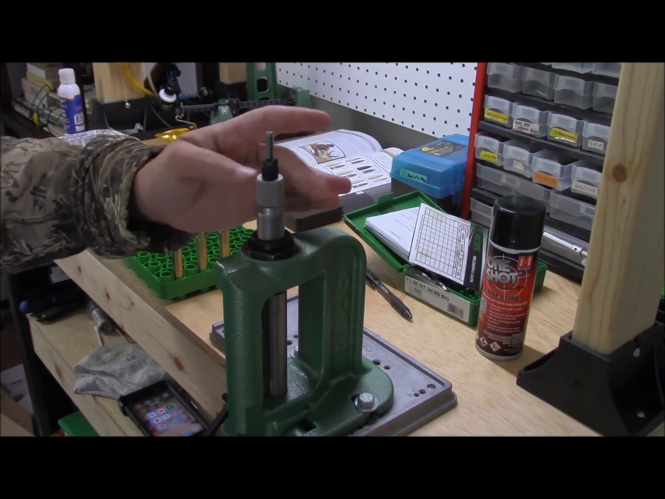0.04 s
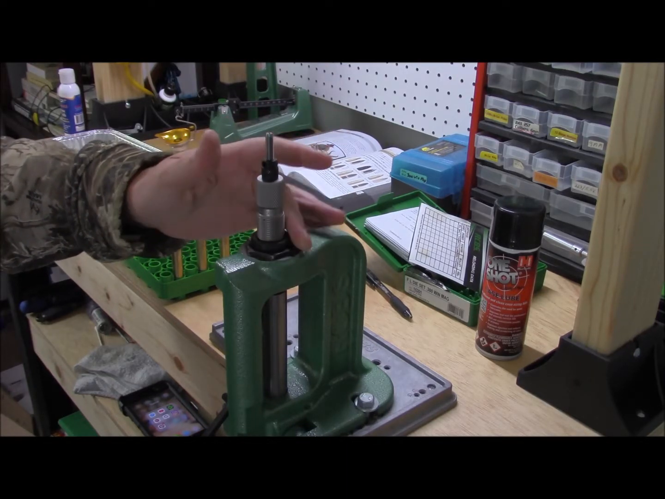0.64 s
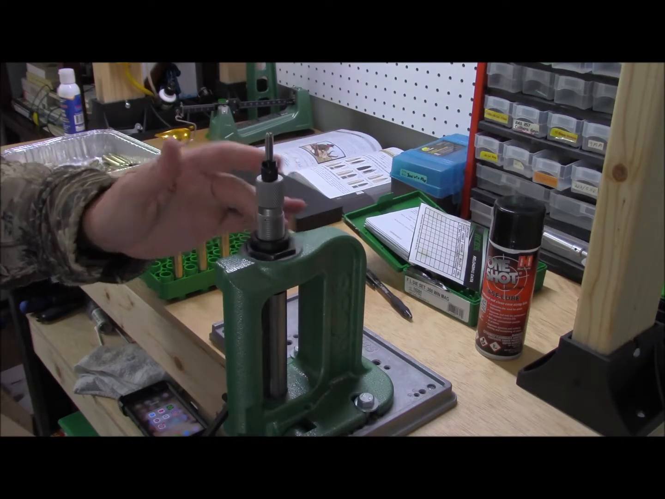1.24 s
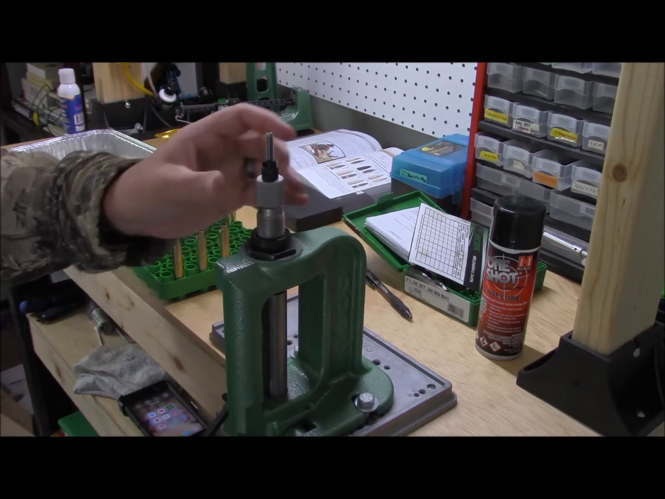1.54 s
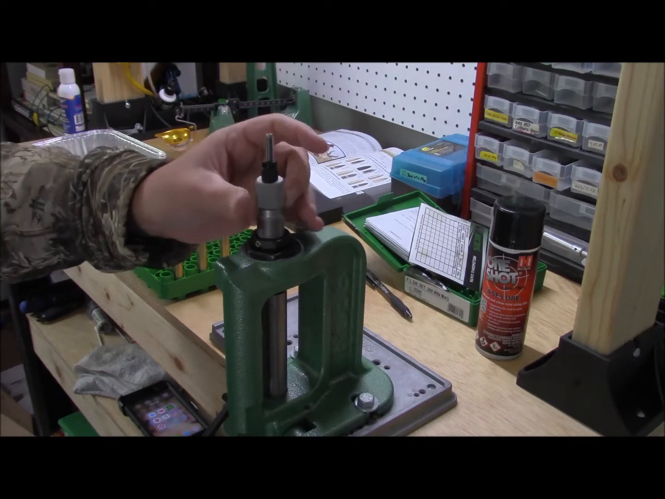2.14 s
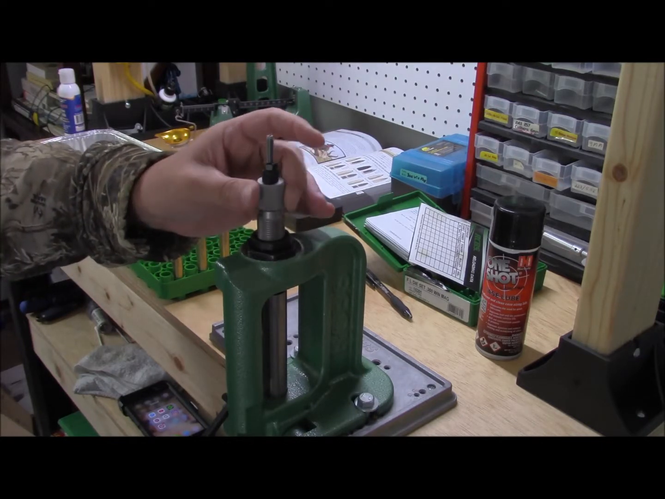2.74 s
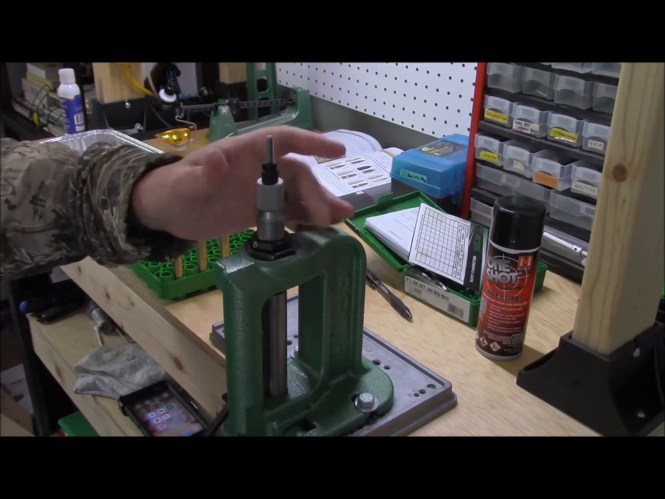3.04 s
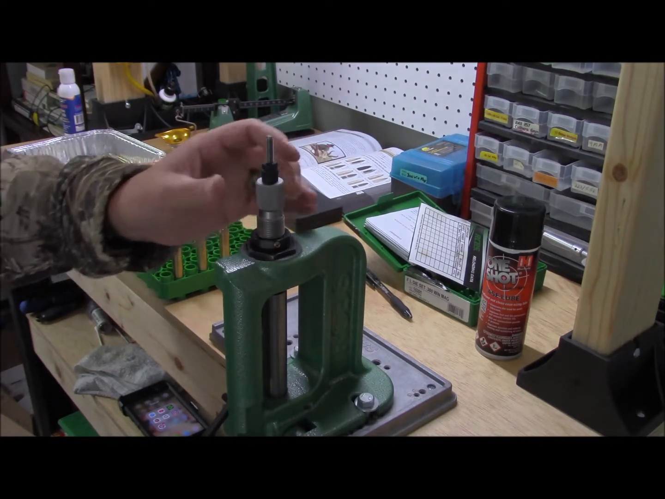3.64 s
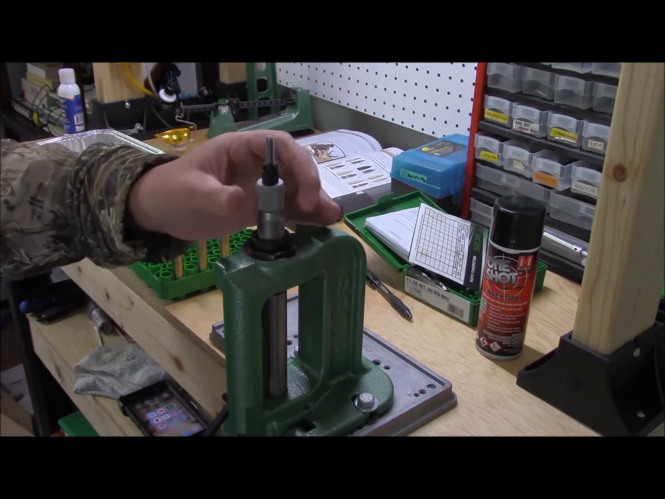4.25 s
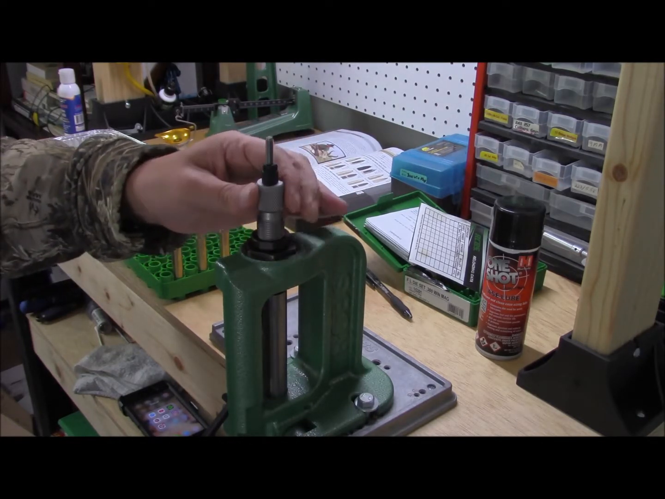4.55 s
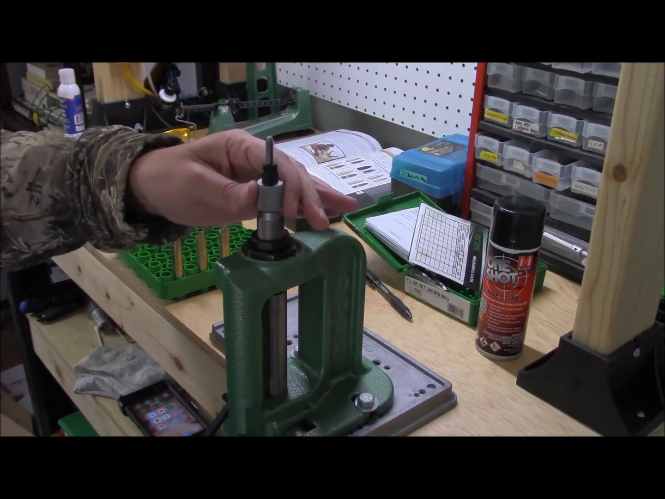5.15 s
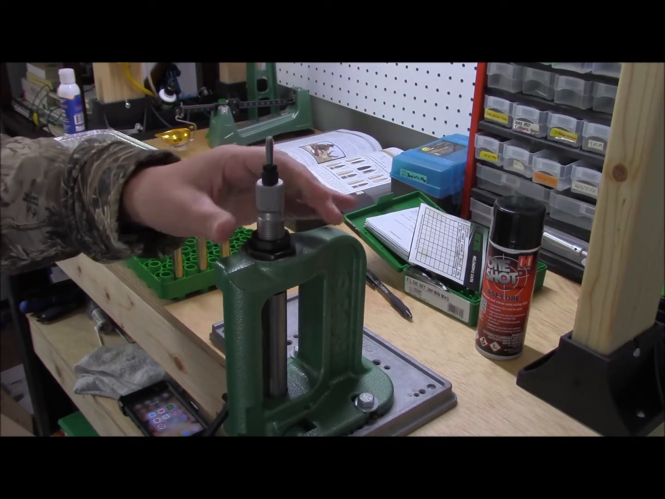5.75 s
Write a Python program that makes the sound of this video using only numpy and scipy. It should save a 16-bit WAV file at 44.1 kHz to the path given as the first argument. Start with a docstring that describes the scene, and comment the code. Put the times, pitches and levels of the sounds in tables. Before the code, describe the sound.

In a small workshop, fingers spin a loose steel die into the threaded top of a cast-iron press. Each of about ten short turns brings light knocks and a wobbling, gritty rasp, and the iron rings briefly. A lock ring clinks now and then, with a tiny squeak and sharp fingernail ticks early on. The last turns are softer. Ventilation, a quiet fluttering fan and a thin electrical whine run underneath. The sound is close and centred.

```python
"""In a small workshop, a steel die is spun by hand into the threaded top of a cast-iron press.
Over ten short turns the loose die knocks in its thread as the fingers grip it, then wobbles and rasps
round; the iron rings with both. The lock ring clinks, a dry spot squeaks, and skin slides and nails tick
on the knurl, the die's ridged grip. Under it all lie humming ventilation, a quiet fluttering fan and
a thin, stuttering electrical whine."""
import sys
import numpy as np
from scipy import signal
from scipy.fft import rfft, irfft
from scipy.io import wavfile
from scipy.ndimage import uniform_filter1d

SR = 44100
rng = np.random.default_rng(int(sys.argv[2]) if len(sys.argv) > 2 else 0)


def materialize(psi):
    """Save the field psi as 16-bit PCM at rate SR to the path in sys.argv[1].

    A 1-D psi becomes a single channel; in a 2-D psi each row is a channel.
    """
    bounded = np.clip(np.atleast_2d(psi).T, -1, 1)
    quanta = np.round(bounded * 32767).astype(np.int16)
    wavfile.write(sys.argv[1], SR, quanta)


N = 259308
TIME = np.arange(N) / SR
HZ = np.maximum(np.fft.rfftfreq(4096, 1 / SR), 1)


def undb(db):
    """Turn decibels into a gain to multiply by."""
    return 10 ** (np.asarray(db) / 20)


def unit(x):
    """Scale a sound to an average power of one."""
    return x / np.sqrt(np.mean(x ** 2))


def curve(points):
    """Join (f/Hz, level/dB) points into one gain for each frequency in HZ."""
    hz, db = np.transpose(points)
    return undb(np.interp(np.log(HZ), np.log(hz), db))


def tint(x, gain):
    """Change a sound's tone with one gain for each frequency in HZ."""
    cepstrum = irfft(np.log(gain + 1e-7))
    half = len(cepstrum) // 2
    # fold onto the first half, so the filter never rings before the sound
    cepstrum[1:half] *= 2
    cepstrum[half + 1:] = 0
    response = irfft(np.exp(rfft(cepstrum)))[:half]
    return signal.fftconvolve(x, response)[:len(x)]


def even(x, bins):
    """Make a random burst equally strong from bass to treble."""
    spectrum = rfft(x, 2 * len(x))
    band_power = uniform_filter1d(np.abs(spectrum) ** 2, size=bins)
    return irfft(spectrum / np.sqrt(band_power))[:len(x)]


def add(track, start_s, sound):
    """Mix a sound into a track at the given time."""
    start = max(int(start_s * SR), 0)
    track[start:start + len(sound)] += sound[:N - start]


def drift(per_s):
    """A value that wanders at random, mostly between -1 and 1."""
    return 1.2 * np.interp(TIME * per_s, np.arange(N // 20), rng.standard_normal(N // 20))


def rubbing(tone, per_s, spread_db):
    """Tiny bumps catch and let go: many small slips, a few large ones."""
    slips = rng.random(N) < per_s / SR
    size_db = spread_db * np.minimum(rng.exponential(size=N), 4)
    clicks = slips * rng.choice([-1, 1], N) * undb(size_db)
    return unit(tint(clicks, curve(tone)))


def bounce(fade_s):
    """One hard hit breaks up into a quick run of tiny rebounds."""
    age = TIME[:len(HZ)] / fade_s
    return even(rng.standard_normal(len(age)) * np.sqrt(age) * np.exp(-age), bins=70)


def push(start_s, driven_s, swell_db, build_s, coast_db_per_s):
    """Loudness of one push: it builds, swells or sags as the fingers drive, then fades as the die coasts."""
    age = np.maximum(TIME - start_s, 0)
    build = 1 - np.exp(-(age / build_s) ** 2)
    to_go = np.maximum(1 - age / driven_s, 0)
    coasting_s = np.maximum(age - driven_s, 0)
    return build * undb(-swell_db * to_go - coast_db_per_s * coasting_s)


# Levels in all tables are relative: they compare one row with another.
# Tone of the low wobble, the middle rasp and the bright grit: f/Hz, level/dB
WOBBLE_TONE = [(100, -34), (180, -10), (245, -3), (420, -0.5), (600, -5), (800, -8.5), (1500, -24.5),
               (4000, -61)]
RASP_TONE = [(300, -18.5), (650, -4.5), (900, 0), (1400, 0), (1900, -3), (2400, -14), (3500, -25.5),
             (7000, -34.5), (14000, -51.5)]
GRIT_TONE = [(900, -28.5), (2300, -2), (2700, 7.5), (3150, 3), (3450, -5.5), (5000, -10), (5600, -12.5),
             (7200, -26.5), (8000, -45), (14000, -47)]
# Finger pushes, one or two to a turn:
# t/s, push length/s, rasp level/dB, grit level/dB, swell/dB, wobble length/s, wobble level/dB
PUSHES = [(-0.05, 0.095, -19.5, -20.5, -7.5, 0.052, -16), (0.339, .2, -26, -33, -0.5, 0.2, -24.5),
          (0.764, 0.094, -22.5, -29, 17.5, 0.16, -33.5), (0.899, 0.049, -27.5, -31.5, -1, 0.04, -26),
          (1.268, .19, -19.5, -22, 10.5, 0.17, -24.5), (1.739, 0.26, -24, -31.5, 15, .33, -25),
          (2.2, 0.21, -24.5, -30, 14, 0.24, -23.5), (2.675, 0.12, -26, -31.5, 3, 0.14, -26.5),
          (2.838, 0.086, -27, -35, -6.5, 0.11, -26.5), (3.209, 0.17, -22.5, -32, 23, .18, -27),
          (3.42, 0.075, -28.5, -34, 0, 0.057, -43), (3.883, 0.14, -31, -37, 5.5, 0.12, -23.5),
          (4.058, 0.046, -26, -33, 3.5, 0.099, -24), (4.36, 0.1, -32, -37.5, 10, 0.15, -33)]
def turning_die():
    """The loose die wobbles, its thread rasps and dry spots add grit; all three judder together."""
    wobble = undb(-5) * rubbing(WOBBLE_TONE, per_s=800, spread_db=1.23)
    rasp = undb(-4) * rubbing(RASP_TONE, per_s=1400, spread_db=2)
    grit = undb(-6) * rubbing(GRIT_TONE, per_s=900, spread_db=2)
    out = np.zeros(N)
    for t, driven_s, rasp_db, grit_db, swell_db, wobble_s, wobble_db in PUSHES:
        out += rasp * undb(rasp_db) * push(t, driven_s, swell_db, build_s=0.02, coast_db_per_s=214)
        out += grit * undb(grit_db) * push(t, driven_s, swell_db, build_s=0.02, coast_db_per_s=205)
        rocking = push(t, wobble_s, 0.39 * swell_db, build_s=0.032, coast_db_per_s=258)
        out += wobble * undb(wobble_db) * rocking
    judder = undb(drift(per_s=90))
    return out * judder


# Notes of the press with the die in it (narrow ones ring longer): f/Hz, width/Hz, level/dB
PRESS_NOTES = [(234.3, 24, 5), (275.6, 9.4, 9), (305.7, 7, 3.5), (394.8, 8.1, 8.5), (583, 21.4, 7.5),
               (729.4, 17.4, 1.5), (919.6, 6.7, 4), (1088, 11, 2.5), (1144.5, 14.6, -2.5), (1274, 23, 4),
               (1446, 18, -7), (1562, 27, -7), (2642, 70, 1), (2832, 61, 1), (3146, 69, -9),
               (3634, 200, -3), (4985, 42, 5.5)]
def press(force):
    """The iron and the die pass on every shake and add their own ringing notes."""
    t = TIME[:SR // 3]
    ring = np.zeros(len(t))
    for hz, width_hz, db in PRESS_NOTES:
        strength = undb(db) * 2 * np.pi * width_hz / SR
        ring += strength * np.exp(-np.pi * width_hz * t) * np.cos(2 * np.pi * hz * t)
    return force + signal.fftconvolve(force, ring)[:N]


# Tone of the moving air, and of the part that spreads left and right: f/Hz, level/dB
AIR_TONE = [(25, -54), (48, -19.5), (105, -6.5), (215, -4.5), (260, -8.5), (370, -4), (450, -9), (730, -10),
            (950, -18.5), (1600, -23), (3500, -29), (6000, -32.5), (12000, -41), (15500, -50)]
AIR_SPREAD = [(30, -19), (120, -15.5), (600, -11.5), (2000, -5), (6000, -8), (14000, -18)]
# Low notes in the air: f/Hz, level/dB
HUM_NOTES = [(134.6, -49.5), (382.2, -52)]
def ventilation():
    """A soft rush of air with two wavering low notes."""
    middle, side = (unit(tint(rng.standard_normal(N), curve(AIR_TONE))) for _ in range(2))
    side = tint(side, curve(AIR_SPREAD))
    air = (middle + np.array([side, -side])) * undb(-40 + 0.78 * drift(per_s=4))
    for hz, db in HUM_NOTES:
        note = np.sqrt(2) * np.sin(2 * np.pi * hz * TIME + 0.8 * drift(per_s=9))
        air += undb(db) * note * (1 + 0.27 * drift(per_s=9.1))
    return air


FAN_TURNS_PER_S = 26.77
def fan(centre_hz):
    """A small fan swishes once each time it goes round."""
    band = 1 / (1 + (2 * np.log2(HZ / centre_hz)) ** 4)
    swish = unit(tint(rng.standard_normal(N), band))
    once_a_turn = np.sin(np.pi * FAN_TURNS_PER_S * TIME) ** 8
    return swish * once_a_turn


def whine(pitch_hz, throb_hz):
    """A thin electrical whine stutters at half the fan's rate, and throbs more slowly."""
    stutter = 0.5 + 0.5 * np.tanh(2 * np.cos(np.pi * FAN_TURNS_PER_S * TIME) + 0.5)
    throb = 1 - 0.5 / (1 + np.exp(10 * (np.cos(2 * np.pi * throb_hz * TIME) + 0.5)))
    return stutter * throb * np.sqrt(2) * np.sin(2 * np.pi * pitch_hz * TIME)


# Tone of a knock: f/Hz, level/dB
KNOCK_TONE = [(40, -29), (150, -11), (230, -6), (600, -1.5), (1400, -1.5), (2300, -3.5), (2700, 2.5),
              (3150, 1.5), (3450, -7.5), (4700, -8.5), (5600, -13), (7200, -13.5), (7800, -26.5),
              (14000, -27.5)]
# The die hits the sides of its thread: t/s, level/dB, contact time/ms, extra thud/dB
DIE_KNOCKS = [(0.013, -9.5, 0.11, -3), (0.326, -20, 0.22, 5), (0.3609, -20, 0.25, 5.5),
              (0.378, -21.5, 0.33, 6), (0.472, -17, 0.17, -0.5), (0.51, -23, 0.24, 3),
              (0.84, -23.5, 0.24, 1), (0.9049, -17, 0.18, 6.5), (1.182, -20.5, 0.063, 4),
              (1.286, -22, 0.27, 2), (1.3497, -17, 0.19, -9), (1.362, -15.5, 0.24, -6),
              (1.424, -15.5, 0.22, -4), (1.442, -20, 0.082, -1), (1.7448, -22.5, 0.27, 8.5),
              (1.834, -29.5, 0.26, 4.5), (1.8979, -16.5, 0.2, 3.5), (2.197, -10.5, 0.3, -7.5),
              (2.266, -10, 0.13, -1.5), (2.358, -17.5, 0.17, 1.5), (2.382, -21, 0.29, 7.5),
              (2.668, -16, 0.21, 0.5), (2.708, -17, 0.21, 2.5), (2.737, -26, 0.21, 13.5),
              (2.86, -17.5, 0.17, 4.5), (3.283, -23, 0.18, 0.5), (3.451, -23.5, 0.21, -8),
              (3.887, -21, 0.21, 5), (4.084, -24, 0.24, 12), (4.4052, -25.5, 0.32, 5)]
def knocks(thud_below_hz):
    """Steel hits the thread: a shorter contact sounds brighter, a heavier one thuds more."""
    out = np.zeros(N)
    for t, db, contact_ms, thud_db in DIE_KNOCKS:
        softness = 1 / np.sqrt(1 + (HZ * contact_ms / 1000) ** 14)
        softness += undb(-17)  # a little treble always gets through
        thud = undb(thud_db / (1 + (HZ / thud_below_hz) ** 6))
        blow = tint(bounce(fade_s=0.0038), curve(KNOCK_TONE) * softness * thud)
        add(out, t, undb(db) * blow)
    return out


# The thumb takes hold of the lock ring: t/s, level/dB
RING_CLINKS = [(0.327, -24), (2.197, -29), (2.668, -23), (3.886, -22.5)]
def clinks(pitch_hz, half_width_hz):
    """The loose lock ring hits the die and rings very briefly."""
    out = np.zeros(N)
    band = 1 / (1 + ((HZ - pitch_hz) / half_width_hz) ** 4)
    for t, db in RING_CLINKS:
        add(out, t, undb(db) * tint(bounce(fade_s=0.002), band))
    return out


# Tone of sliding skin: f/Hz, level/dB
SKIN_TONE = [(3000, -27), (7000, 5), (11800, -8), (12700, 6), (14000, -35)]
# The loudest moment of each slide: t/s, level/dB
FINGER_SLIDES = [(.44, -55), (.88, -57), (1.89, -55.5), (2.34, -57), (2.77, -56), (4.02, -57.5),
                 (4.48, -61)]
def slides(swell_s):
    """Fingertips sizzle faintly as they slide over the fine ridges."""
    swell = sum(undb(db) * np.exp(-((TIME - t) / swell_s) ** 2) for t, db in FINGER_SLIDES)
    return swell * rubbing(SKIN_TONE, per_s=1900, spread_db=4.5)


# Squeaks from a dry spot: t/s, length/s, f/Hz, level/dB
DRY_SQUEAKS = [(0.781, 0.019, 1208, -33), (0.825, 0.014, 1270, -26), (0.84, .016, 1208, -25)]
def squeaks():
    """For a moment the thread sticks and slips in rhythm, making an unsteady note."""
    out = np.zeros(N)
    waver = 0.9 * drift(per_s=250)
    for t, length_s, hz, db in DRY_SQUEAKS:
        progress = np.clip((TIME - t) / length_s, 0, 1)
        burst = np.sqrt(np.sin(np.pi * progress).clip(0))
        out += undb(db) * burst * np.sin(2 * np.pi * hz * TIME + waver)
    return out


# Tone of a tick: f/Hz, level/dB
TICK_TONE = [(40, -59), (300, -31), (1300, 4.5), (3500, -8), (5500, -8.5), (9500, -3.5), (11600, -9),
             (12700, 1.5), (14000, -24), (15700, -17)]
# Fingernails catch the ridges: t/s, level/dB
NAIL_TICKS = [(0.854, -32), (0.9602, -35), (1.1807, -7), (1.3743, -18), (1.38, -10.5), (1.415, -16),
              (1.425, -21), (1.438, -24), (1.461, -19.5), (3.373, -20), (3.4474, -18)]
def ticks():
    """Light, very short taps of a nail ring only the steel of the die."""
    out = np.zeros(N)
    for t, db in NAIL_TICKS:
        add(out, t, undb(db) * tint(bounce(fade_s=0.0021), curve(TICK_TONE)))
    return out


# How long the echoes last: f/Hz, time to fade by 60 dB/s
ECHO_FADES = [(200, 0.18), (1000, 0.44), (3000, 0.39), (7000, 0.4), (14000, 0.08)]
def echo_tail(onset_s):
    """Crowded echoes from bench, shelves and walls; the highest treble dies first."""
    t = TIME[:SR // 2]
    spectrum = rfft(rng.standard_normal(len(t)))
    hz = np.maximum(np.fft.rfftfreq(len(t), 1 / SR), 1)
    centres, fades = np.transpose(ECHO_FADES)
    tail = np.zeros(len(t))
    for this_band, fade_s in zip(np.eye(len(centres)), fades):
        band = np.interp(np.log(hz), np.log(centres), this_band)
        tail += irfft(spectrum * band, len(t)) * undb(-60 * t / fade_s)
    return even(tail, bins=25) * (1 - np.exp(-(t / onset_s) ** 2))


# How much of the echo spreads left and right: f/Hz, level/dB
ECHO_SPREAD = [(200, -42), (1000, -22.5), (2800, -16.5), (5000, -13.5), (13000, -15)]
def workshop(x, echo_db, width_db):
    """The direct sound sits in the middle; its echoes spread a little to the sides."""
    middle, side = (signal.fftconvolve(x, echo_tail(onset_s=0.0011))[:N] for _ in range(2))
    side = tint(side, curve(ECHO_SPREAD) * undb(width_db))
    return x + undb(echo_db) * (middle + np.array([side, -side]))


def scene():
    """The metal sounds pass through the press into the room; the finger sounds go straight into it."""
    force = undb(30.5) * knocks(thud_below_hz=1830)
    force += undb(32) * clinks(pitch_hz=4330, half_width_hz=480)
    force += turning_die() + undb(-0.5) * squeaks()
    fingers = undb(18.5) * ticks() + slides(swell_s=0.076)
    background = ventilation() + undb(-50.5) * fan(centre_hz=1750)
    background += undb(-57) * whine(pitch_hz=5556, throb_hz=2.225)
    metal = workshop(press(force), echo_db=-2.5, width_db=0)
    return metal + workshop(fingers, echo_db=-0.5, width_db=-1) + background


def record(dry):
    """Cut away the treble above 15800 Hz."""
    return signal.sosfilt(signal.ellip(8, 0.2, 70, 15800, fs=SR, output="sos"), dry)


dry = scene()
out = record(dry)
materialize(out)
```